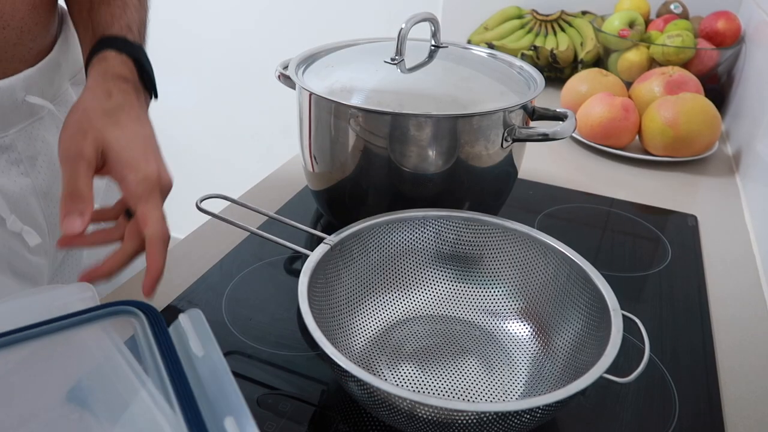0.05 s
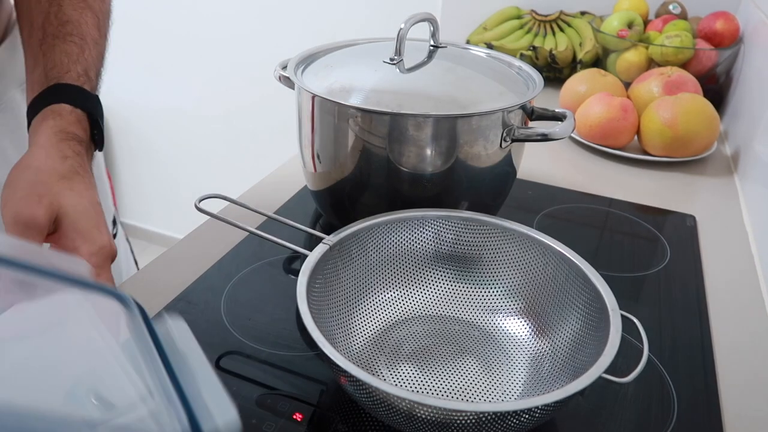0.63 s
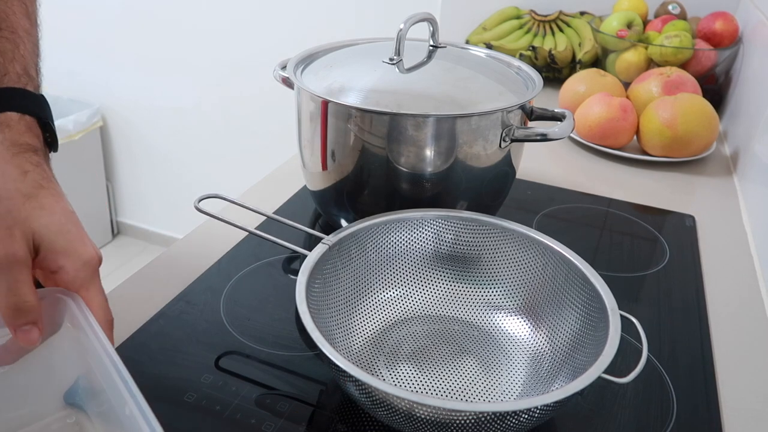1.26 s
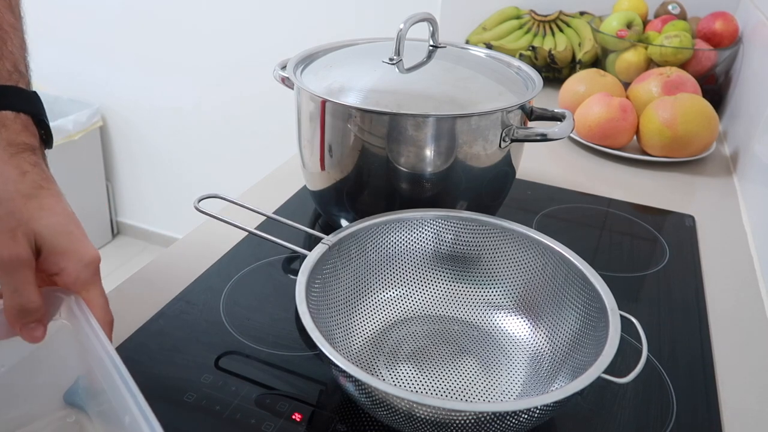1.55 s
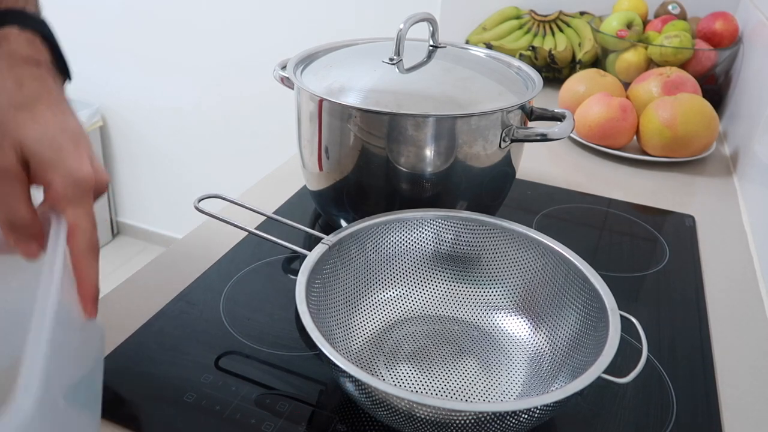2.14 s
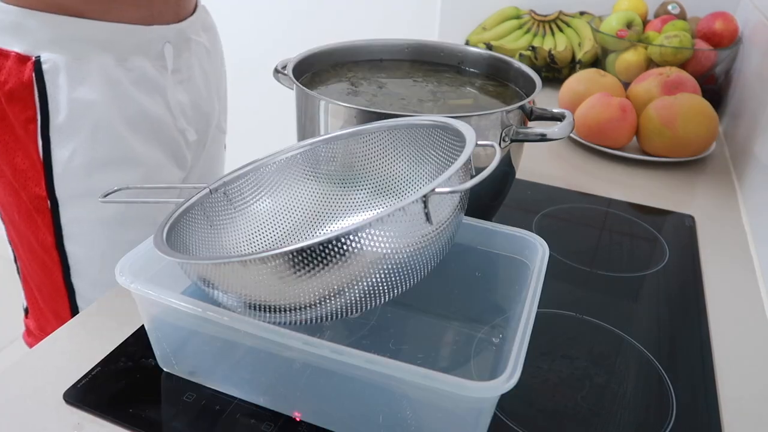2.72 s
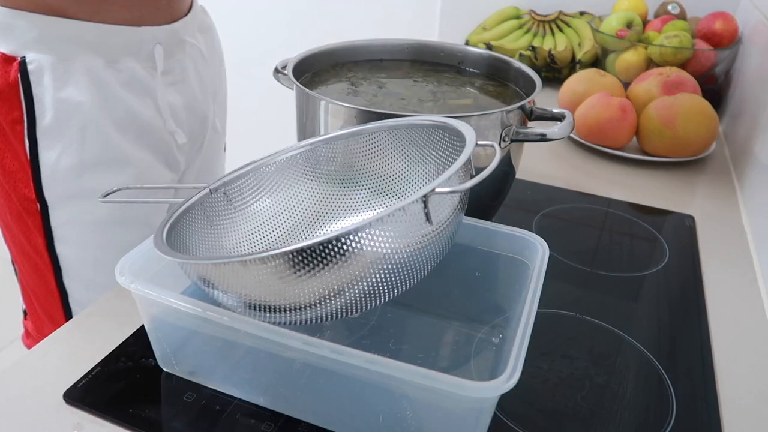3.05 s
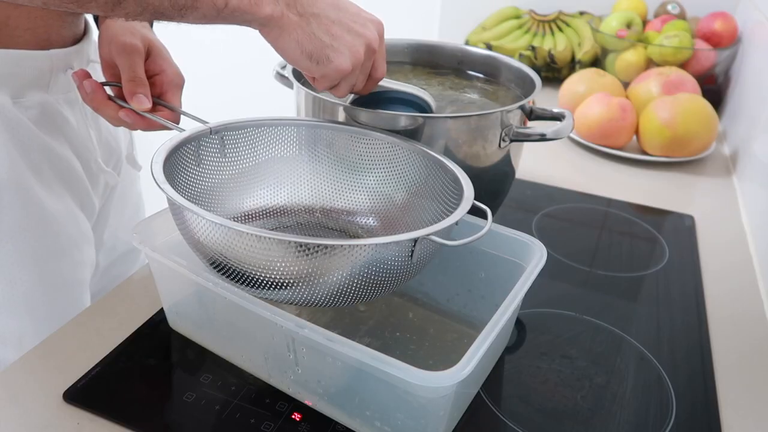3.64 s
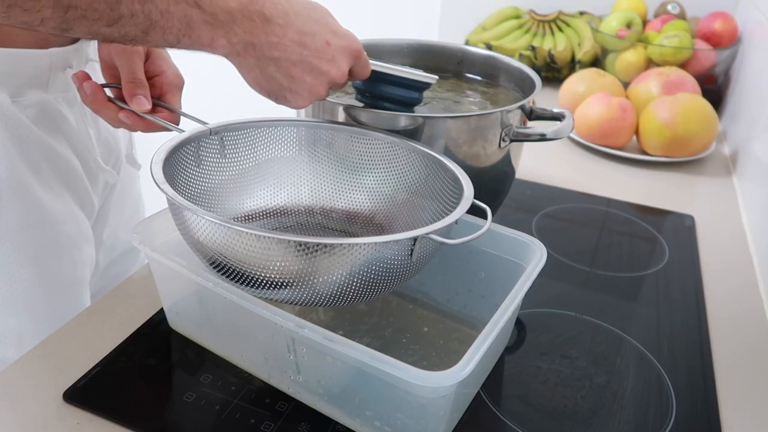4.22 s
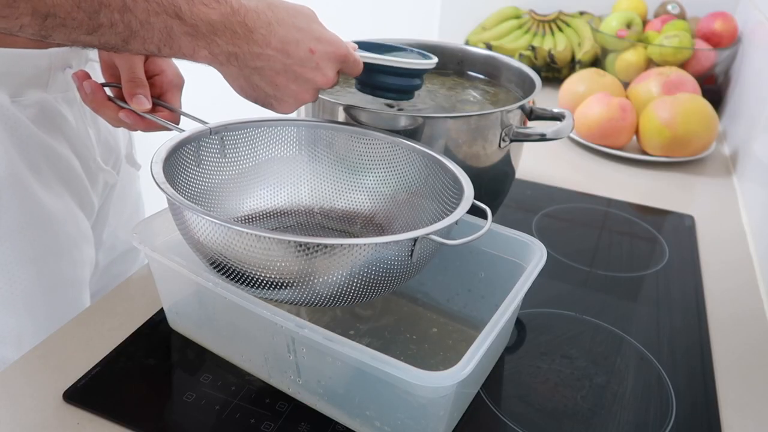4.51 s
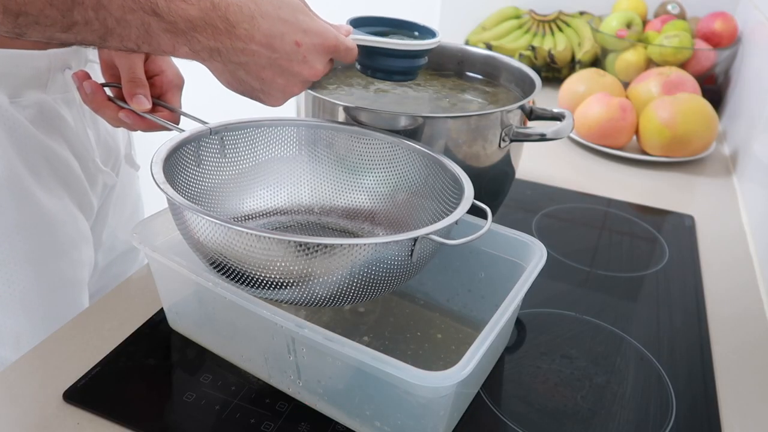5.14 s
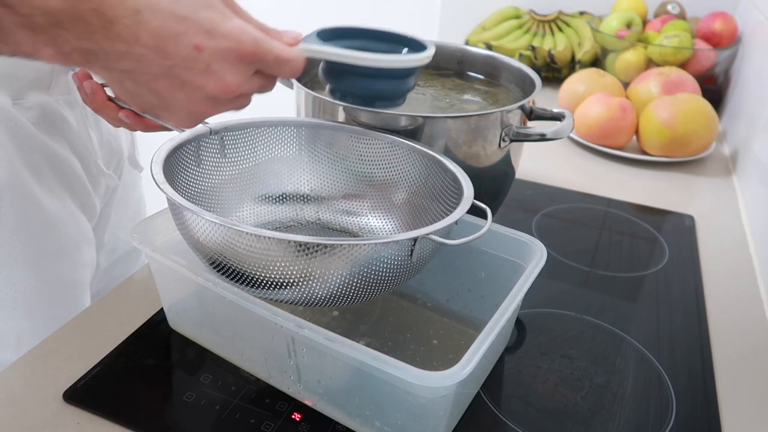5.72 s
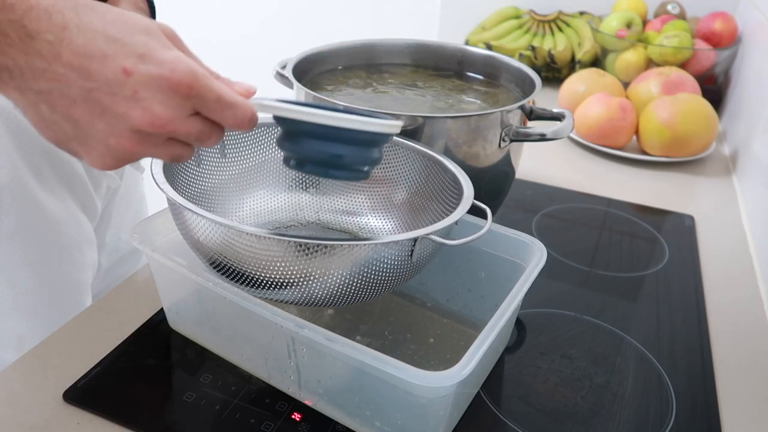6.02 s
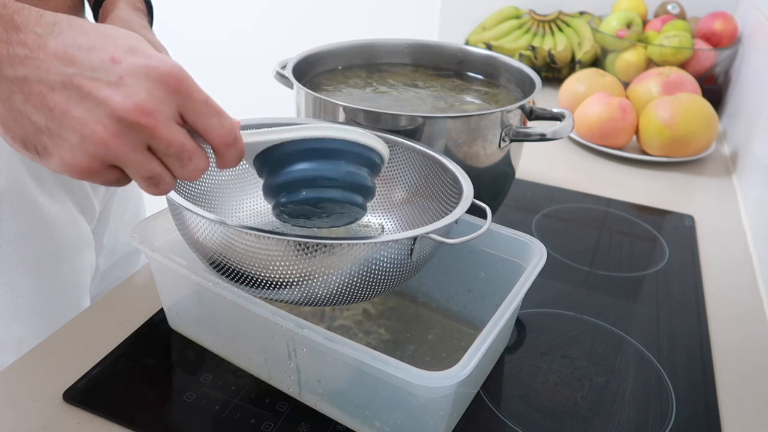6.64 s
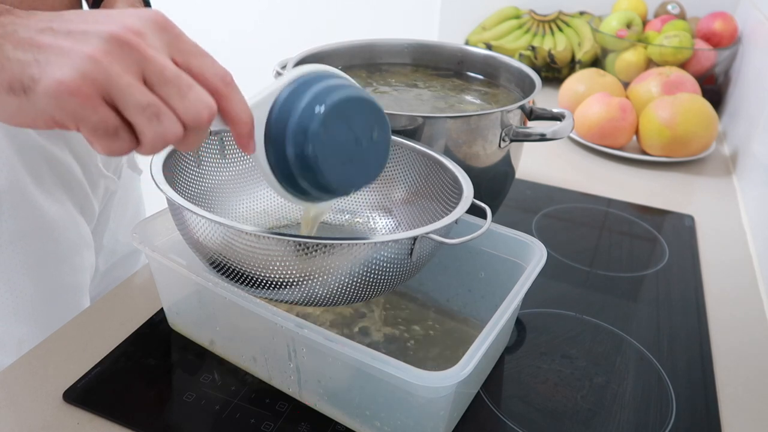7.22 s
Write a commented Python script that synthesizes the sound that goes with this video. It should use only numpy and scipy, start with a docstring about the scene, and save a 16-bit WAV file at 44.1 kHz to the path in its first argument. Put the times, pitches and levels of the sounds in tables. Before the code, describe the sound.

Hollow bumps and a short scrape of plastic containers open the scene, followed by separate knocks on a glass hob and a metal colander landing on a tub. Things grow quiet as a scoop stirs broth, drops plink into the pot and cloth faintly rustles. Then the liquid splashes unevenly through the colander and bubbles into the tub. The sounds are near, with short kitchen reflections over a steady low drone.

```python
"""Plastic boxes and strained broth

Plastic food boxes are bumped, slid and knocked down on a glass hob in a small, hard kitchen, and a
colander is set on one; each impact excites damped normal modes. A scoop swishes in a pot of broth, drips,
and is emptied through the mesh: drops spatter, and trapped air bubbles resonate in the box below.
Under it all the room drones in its low resonances and the hob whines faintly."""
import sys
import numpy as np
from scipy import signal
from scipy.fft import rfft, irfft, next_fast_len
from scipy.io import wavfile
from scipy.ndimage import uniform_filter1d

SR = 44100
rng = np.random.default_rng(int(sys.argv[2]) if len(sys.argv) > 2 else 0)


def transcribe(u):
    """Save the signal u as a 16-bit wav file named by the first command-line argument.

    u: samples, shape (n,) or (channels, n), limited to [-1, 1]; the rate is SR.
    q: integer samples, one column per channel.
    """
    v = np.clip(np.atleast_2d(u).T, -1, 1)
    q = np.round(v * 32767).astype(np.int16)
    wavfile.write(sys.argv[1], SR, q)


N = 329427
TIME = np.arange(N) / SR


def amp(db):
    """Amplitude ratio of a level in decibels."""
    return 10 ** (np.asarray(db) / 20)

def unit(x):
    """Power normalisation to rms 1."""
    return x / np.sqrt(np.mean(x ** 2) + 1e-20)

def burst(x):
    """Energy normalisation of a transient to that of 30 ms at rms 1."""
    return x * np.sqrt(.03 * SR / (np.sum(x ** 2) + 1e-20))

def read(points, hz):
    """Interpolation of a table on a logarithmic frequency axis."""
    f, value = np.transpose(points)
    return np.interp(np.log(hz + 1), np.log(f + 1), value)

def colour(x, points, turn=1):
    """Spectral shaping by a curve in dB, with an optional phase rotation."""
    size = next_fast_len(len(x) + 2048)
    gain = amp(read(points, np.fft.rfftfreq(size, 1 / SR)))
    return irfft(rfft(x, size) * turn * gain, size)[:len(x)]

def add(mix, s, sound):
    """Superposition of a sound on the mix at time s."""
    part = mix[max(round(s * SR), 0):][:len(sound)]
    part += sound[:len(part)]

def ring(modes, t):
    """A sum of exponentially damped sinusoids."""
    return sum(amp(db - 60 * t / t60) * np.sin(2 * np.pi * hz * t) for hz, db, t60 in modes)

def grains(per_s, spread_db):
    """Shot noise: a Poisson train of clicks, mostly small and a few large."""
    size = amp(spread_db * np.minimum(rng.exponential(1, N), 4))
    return size * rng.choice([-1, 1], N) * (rng.random(N) < per_s / SR)

def stroke(start, length, db, attack_s, release_s):
    """Envelope of a movement: linear attack, hold, exponential decay of 60 dB in release_s."""
    age = TIME - start
    return np.clip(age / attack_s, 0, 1) * amp(db - 60 * np.clip((age - length) / release_s, 0, 3))

def strokes(rows, **shape):
    """Superposed envelopes of several movements."""
    return sum(stroke(*row, **shape) for row in rows)

# stereo width of the boxes, the broth and the room air: (frequency [Hz], side gain [dB])
WIDE_BOX = [(200, -35.5), (1000, -20.5), (2200, -15.5), (3700, -6), (5500, -1), (7700, 3), (10500, 11.5),
            (13500, 13)]
WIDE_POT = [(200, -34), (1000, -51), (2200, -25), (3700, -4.5), (5500, -2.5), (7700, 3), (10500, 4),
            (13500, 1)]
WIDE_AIR = [(60, -56.5), (150, -38), (450, -5), (1000, -6), (3700, -1), (7700, 0.5), (13500, 5)]
def stereo(mid, side, width, turn=1j):
    """Pressure gradient: the difference of two close points is in quadrature and grows with frequency."""
    side = colour(side, width, turn)
    return np.array([mid + side, mid - side])

# reverberation time of the kitchen: (frequency [Hz], T60 [s])
ROOM_T60 = [(100, 0.081), (350, 0.58), (900, 0.5), (2500, 0.57), (6000, 0.53), (13000, 0.27)]
# reflections from worktop and walls: (delay [s], relative amplitude [ratio])
ECHOES = [(.0031, 0.078), (.0062, 0.3), (0.0118, 0.39), (0.0169, 0.73)]
SCATTER_HZ, SCATTER_S = 1100, 0.0019  # above this frequency, clutter smears each echo over this time
def kitchen(x, wet_db, width, turn=1j, echo_db=0.0):
    """Reverberation: direct sound, early reflections scattered in the treble, and a diffuse tail."""
    size = 30000
    age = np.arange(size) / SR
    lowpass = signal.butter(1, SCATTER_HZ, fs=SR)
    mid_side = []
    for diffuse, clutter in rng.standard_normal((2, 2, size)):
        hz, t, spectra = signal.stft(diffuse, SR, nperseg=256)
        decay = amp(-60 * t / read(ROOM_T60, hz)[:, None])
        tail = signal.istft(spectra * decay, SR, nperseg=256)[1][:size]
        tail *= np.minimum(age / 0.0053, 1) ** 2
        specular, scattered = np.zeros((2, size))
        for delay, gain in ECHOES:
            specular[round(delay * SR)] += gain
            spread = clutter * (age >= delay) * np.exp(-abs(age - delay) / SCATTER_S)
            scattered += gain * spread / np.linalg.norm(spread)
        early = scattered + signal.lfilter(*lowpass, specular - scattered)
        response = amp(wet_db) * (tail / np.linalg.norm(tail) + amp(echo_db) * early)
        response[0] += 1  # direct path
        mid_side.append(signal.oaconvolve(x, response / np.linalg.norm(response))[:N])
    return stereo(*mid_side, width, turn)

# low room modes: (frequency [Hz], half-width [Hz], relative level [dB])
ROOM_MODES = [(37.5, 9, -53.5), (60.9, 7.3, -36.5), (111.7, 7, -41), (153.7, 4.5, -43.5),
              (161.3, 6.8, -47.5), (188.5, 26, -48), (257, 12.7, -50), (280.6, 8.5, -54.5),
              (351, 54, -55.5)]
def room_drone():
    """Standing waves: noise is confined to the room's narrow low resonances."""
    f = np.fft.rfftfreq(N, 1 / SR)
    power = sum((amp(db) * unit(1 / (1 + ((f - hz) / width) ** 2))) ** 2 for hz, width, db in ROOM_MODES)
    return irfft(rfft(rng.standard_normal((2, N))) * np.sqrt(power), N)

# spectrum of the room air: (frequency [Hz], relative level [dB])
AIR_SPECTRUM = [(20, -20.5), (40, -29), (110, -1), (220, -10.5), (350, -18), (500, -23.5), (750, -25),
                (1300, -29.5), (3000, -37), (6000, -45), (12000, -54.5), (13500, -69), (15500, -77)]
def room_air():
    """Broadband noise: a wash of air, strongest in the bass."""
    return np.array([unit(colour(noise, AIR_SPECTRUM)) for noise in rng.standard_normal((2, N))])

WHINE_HZ, WHINE_WAVER_HZ, WHINE_PULSES_PER_S = 13000, 25, 24
def hob_whine():
    """Amplitude and frequency modulation: a high tone pulses quickly and wavers at random."""
    waver = unit(uniform_filter1d(rng.standard_normal((2, N)), size=300, axis=1))
    phase = 2 * np.pi * np.cumsum(WHINE_HZ + WHINE_WAVER_HZ * waver, axis=1) / SR
    return unit(np.sin(phase) * np.sin(np.pi * WHINE_PULSES_PER_S * TIME) ** 2)

# bounds of the stretches of steady background: (time [s])
STRETCH_BOUNDS = [0, 2.383, 3.176, 7.6]
# background in each stretch: (drone gain [dB], air level [dB], whine level [dB])
STRETCH_LEVELS = [(-4, -46.5, -85), (-2.5, -44, -86), (0, -44, -81.5)]
def background():
    """Incoherent sum of drone, air and whine, whose levels step slightly between stretches."""
    stretch = np.searchsorted(STRETCH_BOUNDS, TIME, "right") - 1
    drone_gain, air_gain, whine_gain = uniform_filter1d(amp(STRETCH_LEVELS)[stretch].T, size=400, axis=1)
    mid, side = drone_gain * room_drone() + air_gain * room_air() + whine_gain * hob_whine()
    return stereo(mid, side, WIDE_AIR)

# plastic slides under the hands: (start [s], duration [s], level [dB], attack [s])
SLIDES = [(0.0, 0.14, -37, 0.0057), (.045, 0.007, -39, 0.0053), (0.208, 0.055, -25, 0.012),
          (0.27, 0.37, -42, .01), (1.482, 0.032, -29.5, .004), (1.642, 0.042, -29.5, 0.009)]
# spectrum of the friction: (frequency [Hz], relative level [dB])
SLIDE_SPECTRUM = [(300, 14), (500, 8), (900, 0.5), (1800, -1), (4200, -10.5), (7000, -21.5), (9500, -29.5),
                  (12000, -42), (15000, -58)]
def sliding():
    """Stick-slip friction: sliding plastic gives off a dense train of tiny impulses."""
    friction = unit(colour(grains(per_s=3200, spread_db=3), SLIDE_SPECTRUM))
    return strokes(SLIDES, release_s=0.12) * friction

# drum-like modes of a box's flat panel: (frequency [Hz], relative level [dB], T60 [s])
PANEL_MODES = [(336, 11.5, 0.067), (353, -6.5, 0.6), (469, -12, 0.22), (723, -16, 0.17)]
BOOM_SAG, BOOM_SAG_S, BOOM_RISE_S = 0.07, .011, 0.0033  # starts flat by this share; recovery; swell
BOOM_HOLD_S, BOOM_CHOKE_S, BOOM_CHOKE_DB = 0.024, .006, -4
def panel_boom(t):
    """Plate vibration: the pressed panel rises in pitch as it springs back, until the hand chokes it."""
    warped_time = t - BOOM_SAG * BOOM_SAG_S * (1 - np.exp(-t / BOOM_SAG_S))
    choke = amp(BOOM_CHOKE_DB * np.clip((t - BOOM_HOLD_S) / BOOM_CHOKE_S, 0, 1))
    return ring(PANEL_MODES, warped_time) * (1 - np.exp(-t / BOOM_RISE_S)) * choke

# spectrum of a hard edge's crack: (frequency [Hz], relative level [dB])
CRACK_SPECTRUM = [(300, -25), (900, 3), (1800, 5), (2600, 4.5), (4000, -5.5), (6000, -11.5), (9000, -17),
                  (12500, -32), (16000, -55)]
def edge_crack(t, buzz, tilt_db, snap_s=.0025):
    """Dispersion: bending waves carry treble ahead of bass, so a buzzing edge snaps in a falling sweep."""
    snap = np.sin(np.pi * SR / 2 * snap_s * (1 - np.minimum(t / snap_s, 1)) ** 2)
    spectrum = [(hz, db + tilt_db * np.log2(hz)) for hz, db in CRACK_SPECTRUM]
    return burst(colour(burst(snap) + amp(-3) * burst(buzz), spectrum))

def blow(modes, chatter_band, chatter_db, knock_db, contact_hz, boom_db, crack_db, tilt_db):
    """Impact excitation: a soft contact rings only the low modes. Returns (knock with crack, boom)."""
    t = np.arange(SR * 3 // 4) / SR
    buzz = rng.standard_normal(len(t)) * amp(-60 * t / 0.043)  # T60 of 43 ms
    # the point of impact sets the sign of each mode
    struck = sum(rng.choice([-1, 1]) * ring([mode], t) for mode in modes)
    chatter = signal.sosfilt(signal.butter(2, chatter_band, "band", fs=SR, output="sos"), buzz)
    body = burst(struck) + amp(chatter_db) * burst(chatter)
    knock = burst(signal.sosfilt(signal.butter(6, contact_hz, fs=SR, output="sos"), body))
    crack = edge_crack(t, buzz, tilt_db)
    return amp(knock_db) * knock + amp(crack_db) * crack, amp(boom_db) * burst(panel_boom(t))

# modes of the worktop: (frequency [Hz], relative level [dB], T60 [s])
WORKTOP_MODES = [(116, -14, 0.2), (136, -0.5, 0.037), (206.7, -16, 0.24)]
def worktop_thud(rise_s=.0012):
    """Inertia: the low modes of the heavy worktop start softly."""
    t = np.arange(SR // 2) / SR
    return burst(ring(WORKTOP_MODES, t) * (1 - np.exp(-t / rise_s)))

# hands bump the lidded box: (time [s], boom level [dB])
BUMPS = [(0.003, -19), (0.047, -8), (0.115, -16), (0.156, -27), (0.24, -17.5)]
def bumps():
    """Nonlinear contact: knock and crack grow faster than the boom, so only a firm bump cracks."""
    contact_hz, tilt_db = 812, -9
    for s, db in BUMPS:
        thud_db, knock_db, crack_db = db - 13, -10 + 1.47 * db, -21 + 1.57 * db
        yield "lid", s, 0, thud_db, knock_db, contact_hz, db, crack_db, tilt_db

# a box or the colander lands: (body, time [s], second edge delay [s], second edge gain [dB], knock [dB],
# contact cut-off [Hz], boom [dB], crack [dB], crack tilt [dB/octave], thud [dB])
LANDINGS = [("lid", 0.689, 0.0028, 0.87, -20.5, 7700, -7, -30, -1.3, -16.5),
            ("lid", 0.725, 0.00904, -2.3, -20, 820, -15, -46, -2, -44),
            ("lid", 0.756, 0.00546, 2.1, -20.5, 1000, -14.5, -39, -1.7, -41),
            ("walls", 1.482, .018, -1.5, -26.5, 2500, -31.5, -35, 1.5, -25),
            ("walls", 1.646, 0.011, -1, -38.5, 3400, -42, -30.5, -6, -47),
            ("walls", 1.7895, .012, 0.74, -16, 2630, -35, -26.5, 0.96, -14),
            ("base", 2.162, 0.0155, 0, -13, 9000, -18, -34, -6, -35),
            ("rim", 2.562, 0.0081, -15, -42, 2600, -43, -47, -5.5, -46),
            ("rim", 2.5745, 0.00295, -1, -35, 3500, -53, -48, -13, -30),
            ("tub", 2.5785, 0.00489, 1, -23, 1080, -35, -40, -20, -23),
            ("tub", 2.866, .008, -6, -13, 1760, -30.5, -40, -1.8, -47),
            ("tub", 2.891, .0065, 0, -17, 1400, -34, -61, -6, -31)]
BOOM_LAG_S = 0.00573  # the panel answers a landing a little late
def landings():
    """Double impact: one edge lands, then the other, duller and without boom or thud."""
    for body, s, gap, second_db, knock_db, contact_hz, boom_db, crack_db, tilt_db, thud_db in LANDINGS:
        yield body, s, BOOM_LAG_S, thud_db, knock_db, contact_hz, boom_db, crack_db, tilt_db
        yield (body, s + gap, 0, -np.inf, knock_db + second_db, 0.87 * contact_hz,
               -np.inf, crack_db + second_db - 2, tilt_db)

# modes of the lidded box, the open box's walls, its base, the colander's steel rim, and the tub
# with the colander in it: (frequency [Hz], relative level [dB], T60 [s])
LID = [(168, 4, 0.065), (258, -1.5, 0.046), (310, -12, 0.034), (478, 1, 0.12), (529, 0, 0.051),
       (660, -3.5, 0.11), (701, 2, 0.13), (841, -2, 0.11), (918, -7.5, 0.13), (993, -4, 0.04),
       (1370, 4, 0.033), (1610, 11, 0.033), (2200, 3, 0.014), (3960, -12, .015), (5370, -14, 0.015)]
WALLS = [(129.4, -14, 0.073), (215, -9, 0.11), (279, -8, 0.069), (380, -5.5, 0.07), (559, -3.5, 0.061),
         (642, 6, 0.046), (727, -7, 0.09), (930, 0.5, 0.069), (1013, -1, 0.052), (1142, 3.5, 0.024),
         (1800, -13, 0.03), (2050, -6, .04), (2160, -15, 0.035), (2500, -14, 0.032)]
BASE = [(148.4, -7.5, 0.094), (215, -10, 0.12), (270, 2, 0.051), (500, -6, 0.04), (574, -3.5, 0.073),
        (657, 0, 0.051), (730, -2.5, 0.065), (870, -5.5, 0.071), (1455, -12, 0.039), (1750, -18.5, 0.032),
        (2480, -19, .025), (3360, -27, .008), (4990, -25, .006)]
RIM = [(1094, 1, .07), (1373, -1, 0.1), (1615, -3, .14), (1756, -1, 0.068), (2050, -4, 0.095),
       (2550, -3, .02), (2980, -3, 0.017)]
TUB = [(187, -1, 0.067), (213.4, 1, 0.12), (284, -3, 0.088), (364, -1, 0.063), (490, -11, 0.049),
       (614, -3.5, .06), (759, 0, 0.06), (822, 4.5, 0.07), (943, 4.5, 0.039), (1022, 4.5, 0.04),
       (1180, 9, 0.025), (1300, 2, 0.015), (1350, 9, 0.013), (1610, 2, 0.037), (1760, -11, 0.045)]
# struck bodies by name: (modes, chatter low edge [Hz], chatter high edge [Hz], chatter level [dB],
# reverberation [dB], left minus right [dB])
BODIES = {"lid": (LID, 320, 1470, 0, -4.5, 0), "walls": (WALLS, 474, 1160, 0.61, 0.3, .4),
          "base": (BASE, 460, 770, -1, -5.5, 0.38), "rim": (RIM, 1050, 2020, -2.5, -3.2, -.7),
          "tub": (TUB, 443, 1320, -0.85, -3, -0.35)}
def boxes(low_cut_hz=95):
    """The struck bodies in the kitchen: knocks, booms and worktop thuds reach the room with the deepest bass
    filtered away."""
    thud = worktop_thud()
    contacts = [*bumps(), *landings()]
    out = np.zeros((2, N))
    for name, (modes, low_hz, high_hz, chatter_db, room_db, pan_db) in BODIES.items():
        knocks, booms = np.zeros((2, N))
        blows = [row[1:] for row in contacts if row[0] == name]
        for s, boom_lag, thud_db, *impact in blows:
            knock, boom = blow(modes, [low_hz, high_hz], chatter_db, *impact)
            add(knocks, s, knock)
            add(booms, s + boom_lag, boom)
            add(booms, s, amp(thud_db) * thud)
        heard = kitchen(knocks, wet_db=room_db, width=WIDE_BOX, echo_db=-4.5)
        heard += amp(-2) * kitchen(booms, wet_db=-5.5, width=WIDE_BOX, echo_db=-7)
        # the ringing stops short at the end of the stretch that holds the body's last blow
        end = min(bound for bound in STRETCH_BOUNDS if bound > blows[-1][0])
        gate = np.clip((end - TIME) / 0.0023, 0, 1)
        out += heard * amp([[pan_db / 2], [-pan_db / 2]]) * gate
    return signal.sosfilt(signal.butter(4, low_cut_hz, "high", fs=SR, output="sos"), out)

# a sharp corner meets the glass: (time [s], level [dB])
TICKS = [(0.69, -63), (1.48, -61), (1.791, -38.5), (1.8, -53)]
# the tick and the faint ring after it: (frequency [Hz], relative level [dB], T60 [s])
TICK_RING = [(5150, 9, 0.0015), (9250, -21, 0.037), (11300, 4, 0.0039), (12300, -2, .012),
             (14200, 2, 0.0008)]
def glass_ticks():
    """Hard contact: a corner on glass gives a sharp, very high tick; a faint, thin ring is heard after it."""
    tick = burst(ring(TICK_RING, np.arange(SR // 20) / SR))
    out = np.zeros(N)
    for s, db in TICKS:
        add(out, s, amp(db) * tick)
    return kitchen(out, wet_db=-4, width=WIDE_BOX)

def bubble(hz, glide, cycles, swell_s=0.0007):
    """Bubble resonance: nearing the surface, it rises by the share glide over the cycles of its T60."""
    t = np.arange(4000) / SR
    t60 = cycles / hz
    phase = 2 * np.pi * hz * (t + glide / t60 * t ** 2 / 2)
    return burst(np.sin(phase) * amp(-60 * t / t60) * (1 - np.exp(-t / swell_s)))

def bubbling(low_hz, high_hz, from_s, per_s, spread_db, cycles, count=64):
    """Constant-Q swarm: bubbles ring for equally many cycles, so the small ones are high and short."""
    pitches = np.linspace(low_hz, high_hz, count) * rng.uniform(.97, 1.03, count)
    births, which = grains(per_s, spread_db), rng.integers(0, count, N)
    bubbles = [bubble(hz, glide=0.042, cycles=cycles) for hz in pitches]
    out = np.zeros(N)
    for at in np.flatnonzero(births * (TIME > from_s)):
        add(out, at / SR, births[at] * bubbles[which[at]])
    return out / np.std(out[TIME > from_s])

def resonate(x, hz, bandwidth):
    """Forced vibration of a resonator whose natural frequency follows hz."""
    carrier = np.exp(2j * np.pi * np.cumsum(hz * np.ones(N)) / SR)
    pole = np.exp(-np.pi * bandwidth / SR)
    return unit((carrier * signal.lfilter([1 - pole], [1, -pole], x / carrier)).real)

# the scoop stirs, fills and runs off:
# (start [s], duration [s], level [dB], liquid resonance [Hz], bandwidth [Hz], resonance gain [dB])
SWISHES = [(3.157, 0.45, -58, 2500, 1200, -8), (3.68, 0.71, -60, 980, 350, -10),
           (3.77, 0.21, -69, 760, 60, 10), (4.26, 0.035, -60.5, 2100, 700, -1),
           (4.45, 0.57, -66.5, 1030, 220, 5), (5.09, 0.62, -58, 2960, 1010, -11),
           (5.15, 0.055, -69, 3300, 260, -2), (5.805, 0.81, -67, 1400, 500, -12),
           (6.42, .075, -60, 710, 25, 6)]
# spectrum of the stirred broth: (frequency [Hz], relative level [dB])
SWISH_SPECTRUM = [(300, 1), (800, 5.5), (1500, -6), (3000, -9), (5000, -16.5), (9000, -26), (15000, -41)]
# the steel pot sings faintly: (start [s], duration [s], level [dB])
POT_RINGS = [(3.18, .27, -66), (5.05, 0.83, -69.5)]
POT_HZ, POT_BANDWIDTH_HZ = 1360, 22
SLOSH_SHARE, SLOSH_PER_S = 0.027, 4.5  # the resonance wanders by this share as the liquid rocks
def scoop():
    """Forced resonance: the wash of the scoop drives liquid and pot, over a trickle of bubbles."""
    wash = unit(colour(grains(per_s=4000, spread_db=0), SWISH_SPECTRUM))
    trickle = bubbling(740, 3430, from_s=SWISHES[0][0], per_s=90, spread_db=3.5, cycles=28)
    rocking = np.interp(TIME * SLOSH_PER_S, np.arange(200), rng.standard_normal(200))
    slosh = 1 + SLOSH_SHARE * unit(uniform_filter1d(rocking, size=2000))
    shape = dict(attack_s=0.028, release_s=0.42)
    out = strokes(POT_RINGS, **shape) * resonate(wash, POT_HZ, POT_BANDWIDTH_HZ)
    for start, length, db, hz, bandwidth, ring_db in SWISHES:
        hollow = amp(ring_db) * resonate(wash, hz * slosh, bandwidth)
        out += stroke(start, length, db, **shape) * (amp(-4) * wash + hollow + amp(-8) * trickle)
    return out

# the arm moves: (start [s], duration [s], level [dB])
RUSTLES = [(3.18, 1.16, -70.5), (3.46, 0.057, -64), (5.9, 0.079, -61), (6.09, 0.046, -63), (6.5, 0.36, -65)]
# spectrum of the cloth: (frequency [Hz], relative level [dB])
RUSTLE_SPECTRUM = [(1500, -22), (4000, 6), (6000, 4.5), (9000, 0), (12000, -12), (14000, -14), (16000, -32)]
def rustle():
    """Stick-slip friction: cloth on the moving arm gives a soft, high hiss."""
    friction = unit(colour(grains(per_s=5500, spread_db=4), RUSTLE_SPECTRUM))
    return strokes(RUSTLES, attack_s=0.011, release_s=0.18) * friction

# spectrum of drop impacts: (frequency [Hz], relative level [dB])
SPATTER_SPECTRUM = [(700, -2.5), (1200, -2), (2200, 0), (3300, -4), (4900, -6), (5600, -6.5), (6600, -9.5),
                    (10000, -16), (13500, -16.5), (15500, -36)]
def slap(decay_s=0.0021):
    """Impact noise: a drop lands with a brief wet click."""
    t = np.arange(SR // 20) / SR
    return burst(colour(rng.standard_normal(len(t)) * np.exp(-t / decay_s), SPATTER_SPECTRUM))

# drips fall back into the pot: (time [s], level [dB], frequency [Hz], T60 [cycles], pitch rise [share])
DRIPS = [(3.41, -61, 3800, 57, .3), (3.525, -43, 1510, 70, 0.16), (3.529, -61, 5550, 110, .15),
         (4.012, -52.5, 3150, 45, .5), (4.042, -50.5, 3420, 42, .32), (4.103, -46, 2860, 41, .26),
         (4.81, -55.5, 944, 40, .3)]
SECOND_BUBBLE_S, SECOND_BUBBLE_RATIO, SECOND_BUBBLE_DB = 0.0089, 0.927, -12
def drips(swell_s=0.00081, slap_db=-13.5):
    """Air entrainment: each drip slaps the surface and traps a bubble, then a larger, fainter one."""
    out = np.zeros(N)
    for s, db, hz, cycles, glide in DRIPS:
        drip = bubble(hz, glide, cycles, swell_s)
        second = bubble(hz * SECOND_BUBBLE_RATIO, glide, cycles * SECOND_BUBBLE_RATIO, swell_s)
        add(drip, 0, amp(slap_db) * slap())
        add(drip, SECOND_BUBBLE_S, amp(SECOND_BUBBLE_DB) * second)
        add(out, s, amp(db) * drip)
    return out

# modes of the colander's bowl: (frequency [Hz], relative level [dB], T60 [s])
BOWL_MODES = [(1080, 5, .16), (2160, -6, .08), (2530, -10, .04), (2830, -4, .04), (3350, -3, .025),
              (5520, 1, .04)]
def spatter(bowl_db=-8.5):
    """Random impact excitation: spray and fine bubbles hit the mesh in clumps and keep the bowl ringing."""
    impacts = unit(grains(per_s=2700, spread_db=2.5))
    fizz = bubbling(1124, 15560, POUR_START_S, per_s=1800, spread_db=2.5, cycles=25)
    clumps_db = 1.8 * unit(uniform_filter1d(rng.standard_normal(N), size=600))
    bowl = unit(signal.oaconvolve(impacts, ring(BOWL_MODES, np.arange(SR // 4) / SR))[:N])
    spray = unit(colour(impacts + fizz, SPATTER_SPECTRUM))
    return (spray + amp(bowl_db) * bowl) * amp(clumps_db)

# spectrum of the bubbles in the box below: (frequency [Hz], relative level [dB])
PLUNGE_SPECTRUM = [(200, 10), (350, 6), (550, -0.5), (800, -2.5), (1200, -1.5), (1700, -9.5), (2600, -4)]
POUR_START_S, POUR_SWELL_S, POUR_HOLD_S = 6.496, 0.35, 0.41
POUR_SWELL_DB, POUR_EBB_DB_PER_S = 22, 33
SPATTER_DB, PLUNGE_DB, PLUNGE_FOLLOW = -41.5, -39.5, 0.38  # at full flow; share of flow level followed
def pour():
    """Plunging jet: the stream spatters and entrains air, swelling as the scoop tips, then ebbing."""
    age = TIME - POUR_START_S
    pouring = age > 0
    swell_db = POUR_SWELL_DB * np.minimum(age / POUR_SWELL_S - 1, 0)
    flow_db = swell_db - POUR_EBB_DB_PER_S * np.maximum(age - POUR_SWELL_S - POUR_HOLD_S, 0)
    spray = spatter()
    bubbles = bubbling(199, 2220, POUR_START_S, per_s=900, spread_db=1.5, cycles=22)
    gurgle = colour(bubbles, PLUNGE_SPECTRUM)
    on_mesh = amp(SPATTER_DB + flow_db) * spray / np.std(spray[pouring])
    in_box = amp(PLUNGE_DB + PLUNGE_FOLLOW * flow_db) * gurgle / np.std(gurgle[pouring])
    return pouring * (on_mesh + in_box)

# fat drops hit the mesh: (time [s], level [dB], frequency [Hz], T60 [cycles])
SPLASHES = [(6.546, -51.5, 2600, 20), (6.572, -54, 2740, 45), (6.691, -49.5, 3130, 57),
            (6.750, -43, 2400, 31), (6.811, -42.5, 3160, 32), (6.813, -49, 1950, 23),
            (6.851, -45, 2090, 36), (6.866, -43, 1080, 40), (6.890, -45, 1980, 40), (6.907, -46, 2960, 40),
            (6.927, -44, 2150, 36), (6.936, -44, 2030, 55), (7.056, -45.5, 3230, 45),
            (7.090, -44.5, 5480, 50), (7.14, -46, 3300, 45), (7.219, -44, 3130, 30), (7.232, -44, 1540, 36),
            (7.238, -45.5, 1110, 24), (7.257, -44, 1330, 23), (7.350, -48, 3230, 30),
            (7.376, -48, 2550, 29), (7.389, -41, 2400, 50), (7.430, -48.5, 2440, 25)]
def splashes(slap_db=-9):
    """Impact and entrainment: each fat drop gives a wet click and one short bubble."""
    out = np.zeros(N)
    for s, db, hz, cycles in SPLASHES:
        add(out, s, amp(db + slap_db) * slap())
        add(out, s, amp(db) * bubble(hz, glide=0.143, cycles=cycles, swell_s=.0014))
    return kitchen(out, wet_db=-3.5, width=WIDE_POT, turn=-1j, echo_db=-1.5)

# gushes hit the mesh: (start [s], duration [s], level [dB], centre frequency [Hz])
GUSHES = [(6.684, 0.013, -46, 2750), (6.807, 0.005, -43, 2500), (6.854, 0.042, -42.5, 2300),
          (6.925, 0.015, -37.5, 2500), (7.142, 0.033, -38, 3470), (7.227, 0.015, -41, 1330),
          (7.233, 0.04, -41.5, 3430), (7.426, 0.016, -42, 2680)]
def gushes(spread=1.34):
    """Bubble clouds: each gush frees bubbles of like size, pitched within a factor spread either way."""
    out = np.zeros(N)
    for start, length, db, hz in GUSHES:
        swarm = bubbling(hz / spread, hz * spread, POUR_START_S, per_s=650, spread_db=4, cycles=27, count=24)
        out += stroke(start, length, db, attack_s=0.0024, release_s=0.046) * swarm
    return out

def scene():
    """Linear superposition of all sources in the kitchen."""
    impacts = boxes() + glass_ticks()
    friction = kitchen(sliding() + rustle(), wet_db=-5, width=WIDE_BOX)
    dripping = drips()
    broth = kitchen(pour() + scoop() + gushes(), wet_db=-3.5, width=WIDE_POT, turn=-1j, echo_db=-1)
    broth += amp(2) * kitchen(dripping, wet_db=-6, width=WIDE_POT, turn=-1j, echo_db=-2)
    return impacts + friction + broth + splashes() + background()

def record(dry, ceiling=.85, cutoff_hz=15500):
    """Soft saturation rounds the peaks; a low-pass filter limits the band."""
    rounded = dry / (1 + (abs(dry) / ceiling) ** 6) ** (1 / 6)
    lowpass = signal.firwin(255, cutoff_hz, window=("kaiser", 9), fs=SR)
    return signal.oaconvolve(rounded, lowpass[None], "same")

dry = scene()
out = record(dry)
transcribe(out)
```